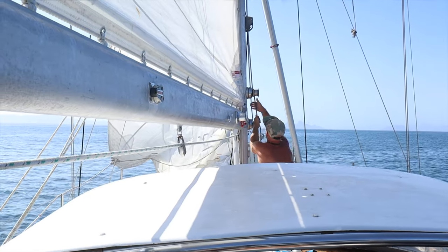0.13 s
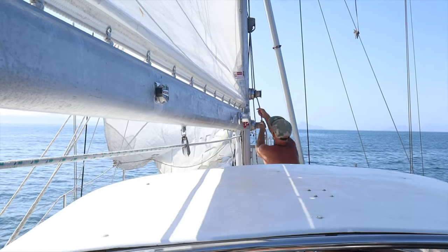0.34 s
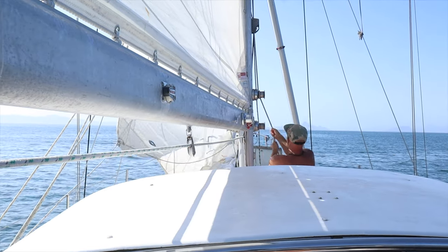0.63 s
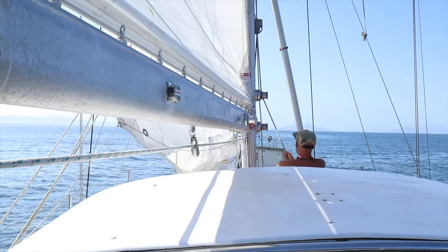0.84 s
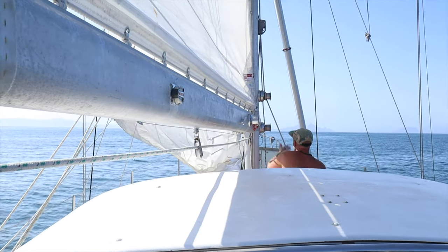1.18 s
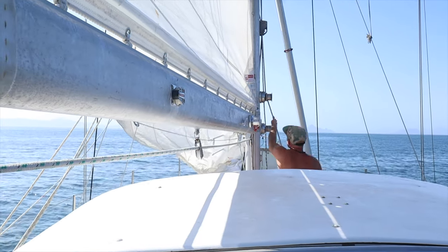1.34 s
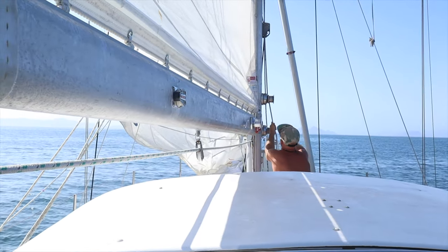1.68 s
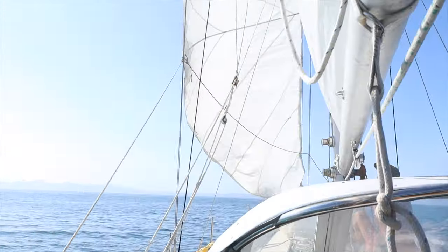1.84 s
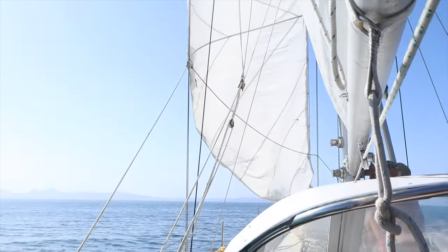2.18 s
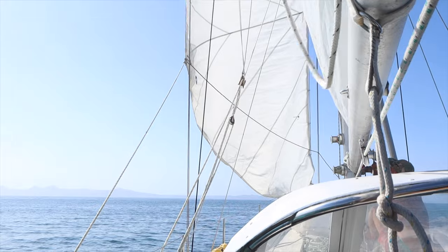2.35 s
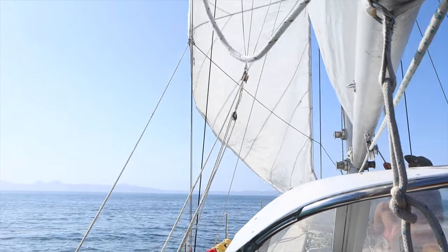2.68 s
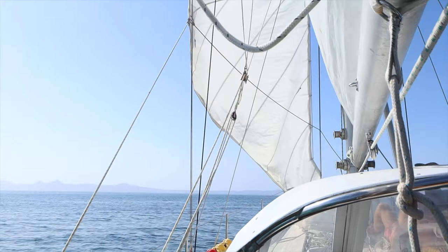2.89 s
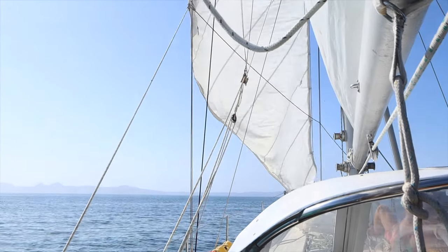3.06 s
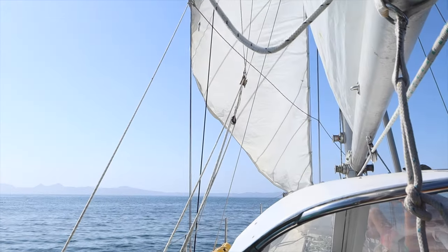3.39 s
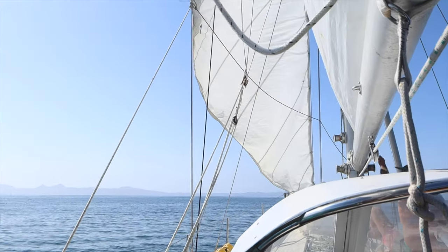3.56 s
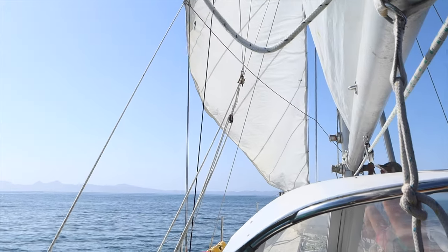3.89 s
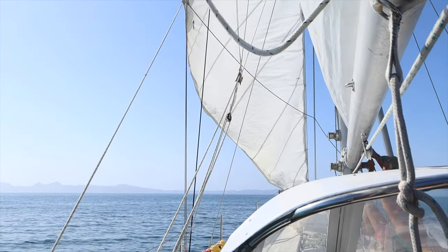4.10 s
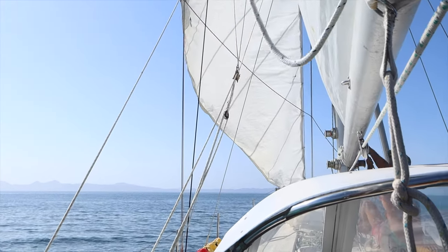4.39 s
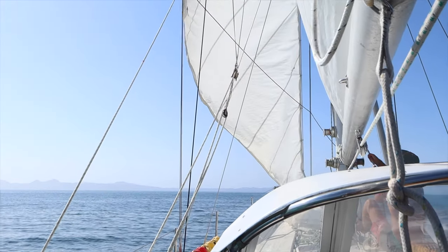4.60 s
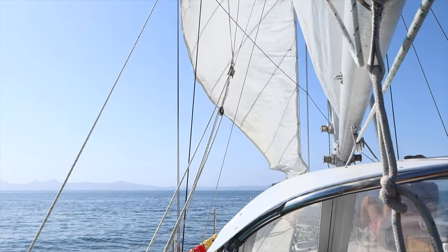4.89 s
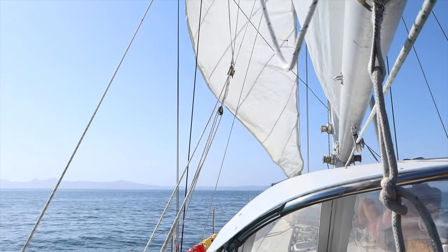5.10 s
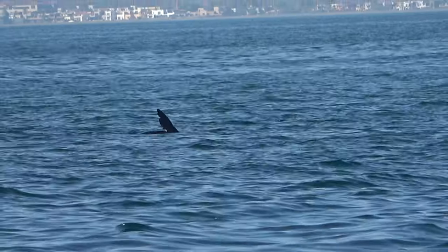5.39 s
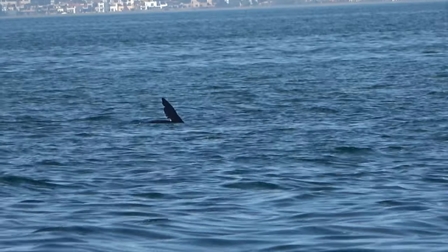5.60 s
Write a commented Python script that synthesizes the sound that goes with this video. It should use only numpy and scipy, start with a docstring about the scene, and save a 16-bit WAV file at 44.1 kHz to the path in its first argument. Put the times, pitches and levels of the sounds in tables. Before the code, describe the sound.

A sailboat's ratchet winch buzzes and rings through three pulls of squeaking, rasping rope, with wind on the microphone and faint water.

```python
"""A ratchet winch on a sailboat's mast clicks and rings as a rope is hauled round it in three pulls.
Its pawls (the catches that drop over the ratchet teeth) speed up from ticks to a buzz. The rope squeaks
as it starts to slide and rasps along the mast, and the metal drum rings until the rope grips it again.
Gear knocks now and then, wind buffets the microphone and calm open water hisses faintly.
At the end a soft wash of ripples swells."""
import sys
import numpy as np
from scipy import signal
from scipy.fft import rfft, irfft, next_fast_len
from scipy.io import wavfile
from scipy.ndimage import uniform_filter1d

SR = 44100
rng = np.random.default_rng(int(sys.argv[2]) if len(sys.argv) > 2 else 0)


def put_to_file(sound):
    """Save the sound as 16-bit audio at rate SR, in the file named by the first command-line argument."""
    columns = np.atleast_2d(sound).T  # one column per channel
    safe = np.clip(columns, -1, 1)
    whole_steps = np.round(safe * 32767)
    wavfile.write(sys.argv[1], SR, whole_steps.astype(np.int16))


N = 253134
TIME = np.arange(N) / SR
FULL_SPEED = 120   # ratchet teeth per second; a speed of 1 in the functions means this

# Levels in the tables are relative: the functions scale them further.
# how fast the drum turns, one curve per pull: (time [s], speed [teeth/s])
SPEED_CURVES = [
    [(0.2828, 31), (0.373, 66), (0.51, 100), (0.58, 120), (0.77, 145), (1.02, 120), (1.08, 72), (1.13, 38),
     (1.2, 14)],
    [(2.356, 27), (2.5366, 61), (2.7, 120), (2.84, 148), (3.05, 120), (3.13, 62), (3.19, 30), (3.23, 7)],
    [(4.2926, 21), (4.372, 19), (4.425, 46), (4.533, 80), (4.62, 120), (4.96, 127), (5.08, 100), (5.16, 55),
     (5.235, 14)],
]
# the pulls: (time the rope grips again [s], pawl level [dB], pawl ring [dB], rope level [dB])
PULL_SETTINGS = [(1.165, -12, -1, -0.5), (3.217, -15.3, -9, 0), (5.19, -17, -6, -1)]
# a pawl drops extra hard: (time [s], level [dB])
HARD_CLICKS = [(0.909, -8), (1.0693, -17), (1.1777, -18), (2.9147, -6.5), (3.1372, -12.5), (3.1647, -20),
               (4.8299, -8)]
# tone colour of a pawl's snap: (frequency [Hz], level [dB])
SNAP_SPECTRUM = [(800, -16.5), (2500, -3.5), (5000, -9), (6500, -2), (8000, 0), (9200, -4), (10500, -17.5),
                 (12000, -19.5), (14000, -16), (15800, -18.5)]
# tones at which a pawl and the mast ring: (frequency [Hz], width [Hz], level [dB])
PAWL_TONES = [(7038, 57, 13.5), (7007, 110, 10), (6530, 93, 9.5), (14720, 120, 15)]
MAST_TONES = [(324.6, 5, 3.5), (694, 100, -7.5), (963, 20, -17.5), (1072, 47, -5), (1104, 25, -10.5),
              (1513, 6.4, 7), (1684, 43, -1.5), (2360, 130, 2)]
# tone colours of the sliding rope: (frequency [Hz], level [dB])
RASP_SPECTRUM = [(450, -12), (700, 0), (1100, 2), (1700, 1.5), (2500, -4.5), (3200, -12), (5000, -22),
                 (10000, -31)]
RUMBLE_SPECTRUM = [(120, -15), (220, -3.5), (330, -2), (430, -1), (600, -7), (900, -13)]
HISS_SPECTRUM = [(1800, -11.5), (3000, 2), (4200, 1), (5600, -4), (8000, -4.5), (10500, -13),
                 (12000, -40.5), (16000, -34.5)]
# the rope slips in a surge: (middle time [s], half length [s], hiss [dB], rasp [dB])
ROPE_SLIPS = [(0.583, .025, -24, -30), (0.767, 0.045, -25, -46), (0.85, 0.034, -26, -22.5),
              (0.966, 0.015, -30, -35), (1.033, 0.047, -21, -26.5), (2.553, 0.027, -35, -27.5),
              (2.77, 0.05, -29.5, -28), (2.928, 0.025, -22, -21), (2.98, 0.021, -49, -21),
              (3.03, 0.068, -23.5, -27.5), (4.637, 0.017, -22.5, -25), (4.89, 0.03, -26, -24),
              (5.006, 0.015, -27, -25), (5.1, 0.043, -23.5, -25.5)]
# squeaks: (time [s], length [s], first pitch [Hz], last pitch [Hz], level [dB], creak against tone [dB])
ROPE_SQUEAKS = [(0.333, 0.068, 585, 727, -29, 3.5), (0.39, 0.1, 1130, 1440, -33, 2),
                (2.353, 0.043, 950, 930, -34.5, -4.5), (2.397, 0.056, 700, 774, -29, -1),
                (2.431, 0.055, 1150, 1393, -24, -3), (2.483, 0.031, 1130, 1100, -18.5, -6),
                (4.376, 0.041, 1010, 1020, -35, -2), (4.423, 0.0346, 1005, 966, -21, -6),
                (4.48, .04, 1120, 1124, -22, -1.5)]
# the drum's bell-like tones: (frequency [Hz])
DRUM_PITCHES = [1058, 1490, 2724, 4506, 6477, 8590, 8764, 10900, 13538]
# for each of them: (width [Hz], level [dB], time to build and fade [s], share of the pawl ring [0-1])
DRUM_TONES = [(30, -42.5, 0.15, 0), (30, -38, .08, 0), (26, -36, 0.075, 0.1), (16, -35, 0.11, 0.41),
              (18, -32, .07, 0.89), (70, -38.5, 0.099, .4), (29, -37.5, 0.076, 0),
              (216, -49.5, 0.056, 0.16), (43, -57.5, .05, 0.79)]
# the rope catches one drum tone, which sings out: (time [s], frequency [Hz], level [dB])
DRUM_CATCHES = [(0.59, 4506, -39), (0.92, 6477, -24), (1.03, 2724, -27), (1.03, 6477, -31),
                (1.03, 13538, -27), (1.04, 1490, -25.5), (1.105, 4506, -28.5), (1.15, 4506, -40),
                (2.92, 8764, -26), (3.005, 4506, -23), (3.055, 2724, -19), (3.13, 2724, -27),
                (3.21, 2724, -41), (4.64, 4506, -31), (4.9, 1058, -17), (4.92, 2724, -35), (5.1, 2724, -29),
                (5.185, 2724, -30)]
# tones of the drum's rim: (frequency [Hz], width [Hz], level [dB])
RIM_TONES = [(10710, 100, -1), (10960, 70, -9)]
# when the rim whistles: (time [s], length [s], level [dB])
RIM_WHISTLES = [(0.543, 0.069, -38), (2.555, 0.052, -39), (2.701, 0.12, -34), (2.94, 0.26, -49),
                (4.535, 0.037, -34), (4.602, 0.073, -34.5), (4.78, 0.39, -40)]
# knocks: (time [s], level [dB], pitch [Hz], width [share of pitch], time to fade by 60 dB [s])
GEAR_KNOCKS = [(0.252, -39.5, 1500, 1.5, 0.12), (1.174, -28, 840, 0.66, 0.084),
               (1.293, -36, 980, 0.72, 0.09), (1.333, -39, 790, 0.78, 0.2), (1.335, -43, 1690, 0.072, 0.2),
               (1.366, -41, 7000, 0.4, .06), (1.378, -36.5, 3000, 0.69, 0.051), (1.385, -34, 370, 0.6, 0.2),
               (1.553, -27.5, 590, 0.44, 0.14), (1.772, -37.5, 725, 0.65, 0.19),
               (1.825, -50, 1190, 1.4, .08), (1.835, -45, 3600, 0.032, 0.079),
               (2.043, -50, 6000, 0.78, 0.098), (2.243, -37.5, 1670, 0.44, 0.17),
               (3.564, -50.5, 5770, 0.81, 0.22), (4.28, -40, 2800, 0.65, 0.11),
               (4.286, -27, 1150, 1.55, 0.11), (5.151, -23, 345, 0.068, 0.23), (5.19, -31, 550, 0.62, 0.29),
               (5.269, -30.5, 750, 0.46, 0.087), (5.658, -33, 794, 0.34, 0.046)]
# strength of the wind: (time [s], deep buffets [dB], flutter above them [dB])
WIND_LEVELS = [(0.0, -49, -36), (0.06, -41.5, -56), (0.7, -35.5, -38.5), (0.8, -47, -38.5),
               (0.91, -32.5, -40), (1.45, -44.5, -41.5), (1.55, -30, -36), (2.49, -32.5, -42.5),
               (2.78, -28.5, -35), (3.74, -25, -35.5), (4.28, -28.5, -41), (4.89, -25.5, -30.5),
               (4.92, -42, -29), (4.99, -28, -31), (5.13, -33.5, -39), (5.35, -26, -36.5), (5.4, -43, -45),
               (5.74, -38, -50)]
# tone colours of the wind: (frequency [Hz], level [dB])
BUFFET_SPECTRUM = [(10, -10.5), (22, -2), (36, 2.5), (70, -4.5), (110, -11), (200, -28.5)]
FLUTTER_SPECTRUM = [(55, -8), (95, -1.5), (160, -1), (250, -9), (400, -29), (800, -40.5)]
# loudness of the sea round the hull: (time [s], level [dB])
SEA_LOUDNESS = [(0.2, -46.5), (1.55, -41.5), (1.95, -46.5), (5.38, -47)]
# tone colours of the sea and the closing wash: (frequency [Hz], level [dB])
SEA_SPECTRUM = [(180, -8), (300, -4.5), (480, -9.5), (750, -13.5), (1300, -20.5), (2800, -28.5),
                (7300, -34), (16000, -37.5)]
WASH_SPECTRUM = [(150, -24), (300, -9.5), (450, -3), (700, -9), (1000, -7), (1600, -11), (3000, -16),
                 (5200, -20), (6200, -28.5), (9000, -32.5), (16000, -47)]


def ratchet(speed, pawl_db, uneven_db=2.02, jitter_s=0.00054, bounce_s=0.005, bounce_db=-7):
    """Times and strengths of one click and its bounce per tooth, harder as the drum turns faster."""
    teeth_passed = np.ceil(np.cumsum(speed) * FULL_SPEED / SR)
    teeth = np.flatnonzero(np.diff(teeth_passed, prepend=0))
    jitter, uneven, loose = rng.standard_normal((1000, 3))[:len(teeth)].T
    times = TIME[teeth] + jitter_s * jitter
    strengths = speed[teeth] * from_db(pawl_db[teeth] + uneven_db * uneven)
    bounce_times = times + bounce_s * np.exp(loose / 2)
    return np.r_[times, bounce_times], np.r_[strengths, from_db(bounce_db) * strengths]


def pawls(speeds, pawl_db, ring_db, snap_s=0.028, tail_s=0.069, tail_db=-13):
    """Each drop of a pawl is a snap of noise with a softer tail; it makes the pawl ring."""
    hard_s, hard_db = np.transpose(HARD_CLICKS)
    clicks = [ratchet(speed, pawl_db) for speed in speeds]
    times, strengths = np.hstack(clicks + [(hard_s, from_db(hard_db))])
    power = np.zeros(N)
    np.add.at(power, (times * SR).astype(int), strengths ** 2)
    power = lagged(power, lag_s=0.0005)
    envelope = np.sqrt(decay(power, snap_s) + from_db(tail_db) ** 2 * decay(power, tail_s))
    snap = colour(envelope * rng.standard_normal(N), SNAP_SPECTRUM)
    return snap + from_db(ring_db) * ringing(snap, PAWL_TONES)


def rope(speed, rasp_db=-23.5, rumble_db=-29, hiss_db=-37):
    """Strands catch and slip, shaking the hollow mast; fibres hiss on the drum. All grow with speed."""
    slip_hiss, slip_rasp = sum(from_db([[hiss], [rasp]]) * np.exp(-((TIME - s) / half_s) ** 2)
                               for s, half_s, hiss, rasp in ROPE_SLIPS)
    rasp = through_mast(noise(RASP_SPECTRUM, grain_db=1.9, grain_rate=350))
    rumble = through_mast(noise(RUMBLE_SPECTRUM, grain_db=1.5, grain_rate=150))
    hiss = noise(HISS_SPECTRUM, grain_db=3.4, grain_rate=400)
    # hypot adds the power of steady sliding to the power of the slips
    rasp *= np.hypot(from_db(rasp_db) * speed ** 1.12, slip_rasp)
    rumble *= np.hypot(from_db(rumble_db) * speed ** 0.92, from_db(-7) * slip_rasp)
    hiss *= np.hypot(from_db(hiss_db) * speed ** 0.88, slip_hiss)
    judder = from_db(0.5 * drift(60))
    return judder * (rasp + rumble + hiss)


def through_mast(x):
    """The hollow mast adds its own tones to a sound; the result has a power of one."""
    return rms_one(x + ringing(x, MAST_TONES))


def squeaks(overtone_db=-22):
    """The tight rope sticks and slips: a gliding tone, broken up by uneven slips into a creak."""
    out = np.zeros(N)
    for s, length, first_hz, last_hz, db, creak_db in ROPE_SQUEAKS:
        hz = np.interp(TIME, [s, s + length], [first_hz, last_hz])
        wobble = 1 + 0.05 * from_db(creak_db) * drift(250)
        phase = 2 * np.pi * np.cumsum(hz * wobble) / SR
        creak = (drift(380) * np.sin(phase) + drift(380) * np.cos(phase)) / np.sqrt(2)
        tone = np.sin(phase) + from_db(overtone_db) * np.sin(2 * phase)
        envelope = between(s, s + length, attack_s=0.015, release_s=0.016)
        out += from_db(db) * envelope * (tone + from_db(creak_db) * creak)
    return out


def drum(speed, ring_db, catch_db=-1, attack_s=0.0095, fade_s=0.035):
    """Rubbing makes the drum ring like a bell, lingering as it slows; at times one tone sings out."""
    rub = speed ** 1.6
    levels = [from_db(db + share * ring_db) * lagged(rub, lag_s) for _, db, lag_s, share in DRUM_TONES]
    for s, hz, db in DRUM_CATCHES:
        nearest = np.argmin(np.abs(np.array(DRUM_PITCHES) - hz))
        from_peak = np.maximum((s - TIME) / attack_s, (TIME - s) / fade_s)
        levels[nearest] += from_db(db + catch_db) * np.exp(-from_peak.clip(max=20))
    return sum(level * singing(hz, width)
               for level, hz, (width, *_) in zip(levels, DRUM_PITCHES, DRUM_TONES))


def singing(hz, width, flare_db=1.5):
    """One tone kept ringing by rubbing; the shifting turns of rope damp it unevenly."""
    ring = resonate(resonate(rng.standard_normal(N), hz, width), hz, width)
    return evened(ring, window_s=0.14) * from_db(flare_db * drift(22))


def whistles():
    """The drum's rim whistles thinly once the drum is well under way."""
    envelope = sum(from_db(db) * between(s, s + length, attack_s=0.019, release_s=0.03)
                   for s, length, db in RIM_WHISTLES)
    return envelope * sum(from_db(db) * singing(hz, width) for hz, width, db in RIM_TONES)


def knocks(boost_db=2, attack_s=0.0081):
    """Rope and fittings strike soft blows that die away quickly."""
    out, age = np.zeros(N), TIME[:SR // 3]
    attack = np.minimum(age / attack_s, 1)
    for s, db, hz, width, fade_s in GEAR_KNOCKS:
        thud = resonate(rng.standard_normal(len(age)), hz, width * hz)
        thud = rms_one(resonate(thud, hz, 2 * width * hz))
        thud *= attack * from_db(db + boost_db - 60 * age / fade_s)
        start = int(s * SR)
        out[start:start + len(age)] += thud[:N - start]
    return out


def deck_echoes(x, echo_db=-12, fade_s=0.05, count=24):
    """Mast, boom, sail and cabin top add a scatter of quick echoes to a sound."""
    distance, flip = rng.random((count, 2)).T
    delays_s = 0.002 + 0.03 * distance
    strengths = rms_one(from_db(-60 * delays_s / fade_s)) * np.sign(flip - 0.5) / np.sqrt(count)
    echoes = sum(gain * np.interp(TIME - delay, TIME, x) for delay, gain in zip(delays_s, strengths))
    return (x + from_db(echo_db) * echoes) / np.hypot(1, from_db(echo_db))


def wind(buffet_trim_db=1, flutter_trim_db=-1):
    """Air swirls at the microphone: deep buffets with a quicker flutter above."""
    buffet_db, flutter_db = in_time(WIND_LEVELS)
    buffet = evened(noise(BUFFET_SPECTRUM), window_s=0.86)
    flutter = evened(noise(FLUTTER_SPECTRUM, grain_db=3.5, grain_rate=40), window_s=0.18)
    return from_db(buffet_db + buffet_trim_db) * buffet + from_db(flutter_db + flutter_trim_db) * flutter


def water(wash_start_s=5.385, wash_db=-48, rise_db_per_s=17):
    """A faint sea hiss gives way to a duller, closer wash of ripples that swells."""
    sea = from_db(in_time(SEA_LOUDNESS)[0]) * noise(SEA_SPECTRUM, grain_db=1, grain_rate=90)
    swell = from_db(wash_db + rise_db_per_s * (TIME - wash_start_s))
    wash = swell * noise(WASH_SPECTRUM, grain_db=2, grain_rate=90)
    return np.where(TIME < wash_start_s, sea, wash)


def from_db(db):
    """Turn decibels into a number to multiply by."""
    return 10 ** (np.asarray(db) / 20)


def rms_one(x):
    """Scale a sound to an average power of one."""
    return x / np.sqrt(np.mean(x ** 2) + 1e-20)


def evened(x, window_s):
    """Hold the power near one over every stretch of the given length."""
    size = int(window_s * SR / 2)
    power = uniform_filter1d(uniform_filter1d(x * x, size), size)
    return x / np.sqrt(np.abs(power) + 1e-5 * np.mean(x * x))


def in_time(rows):
    """Join a table's timed points with straight lines, one curve per column of values."""
    times, *columns = np.transpose(rows)
    return [np.interp(TIME, times, column) for column in columns]


def between(start, end, attack_s, release_s):
    """One from start to end, fading in before and out after."""
    return np.clip(np.minimum((TIME - start) / attack_s, (end - TIME) / release_s) + 1, 0, 1)


def lagged(x, lag_s):
    """Follow a curve sluggishly, as something heavy would."""
    keep = np.exp(-1 / (lag_s * SR))
    return signal.lfilter([1 - keep], [1, -keep], x + 1e-18)


def decay(power, fade_s):
    """Let pulses of power die away by 60 dB in fade_s."""
    return signal.lfilter([1], [1, -from_db(-120 / (fade_s * SR))], power + 1e-18)


def drift(rate):
    """A random wander of about one either way that changes rate times a second."""
    points = rng.standard_normal(N // 32)
    return np.interp(TIME * rate, np.arange(len(points)), points) * np.sqrt(3 / 2)


def colour(x, spectrum):
    """Filter a sound to the given tone colour, falling 20 dB per octave past its ends."""
    hz, db = np.transpose(spectrum)
    size = 2 * next_fast_len(N // 2 + SR // 8)
    grid_hz = np.maximum(np.arange(size // 2 + 1) * SR / size, 1)
    octaves_outside = np.maximum(np.log2(hz[0] / grid_hz), 0) + np.maximum(np.log2(grid_hz / hz[-1]), 0)
    gain = from_db(np.interp(np.log(grid_hz), np.log(hz), db) - 20 * octaves_outside)
    # minimum phase: the filter never sounds ahead of a click
    cepstrum = irfft(np.log(gain))
    cepstrum[1:size // 2] *= 2
    cepstrum[size // 2 + 1:] = 0
    return irfft(rfft(x, size) * np.exp(rfft(cepstrum)))[:N]


def noise(spectrum, grain_db=0, grain_rate=100):
    """Coloured noise with a power of one; its level flickers grain_rate times a second."""
    grainy = rng.standard_normal(N) * from_db(grain_db * drift(grain_rate))
    return rms_one(colour(grainy, spectrum))


def resonate(x, hz, width):
    """Ring at one frequency; the smaller the width in Hz, the longer the ring."""
    radius = np.exp(-np.pi * width / SR)
    feedback = [1, -2 * radius * np.cos(2 * np.pi * hz / SR), radius ** 2]
    return signal.lfilter(np.array([1, 0, -1]) * (1 - radius ** 2) / 2, feedback, x + 1e-18)


def ringing(x, tones):
    """The tones that a sound sets ringing in an object."""
    return sum(from_db(db) * resonate(x, hz, width) for hz, width, db in tones)


def scene(pull_s=0.92, grip_s=0.058, stretch_lag_s=0.01):
    """The winch and its rope, driven by the speed of the drum, over knocks, wind and water."""
    speeds = [np.interp(TIME, *np.transpose(curve), left=0, right=0) / FULL_SPEED
              for curve in SPEED_CURVES]
    speed = sum(speeds)
    pulls = np.array(PULL_SETTINGS)
    current_pull = np.maximum(np.searchsorted(pulls[:, 0] - pull_s, TIME) - 1, 0)
    end_s, pawl_db, ring_db, rope_db = pulls[current_pull].T
    clicks = pawls(speeds, pawl_db, ring_db)
    sliding = from_db(rope_db) * rope(lagged(speed, stretch_lag_s))   # stretchy rope trails the drum
    winch = deck_echoes(clicks + sliding + squeaks())
    free = between(end_s - pull_s, end_s, grip_s, grip_s)   # the drum rings until the rope grips it
    return (winch + free * drum(speed, ring_db) + whistles() + knocks() + wind() + water())[None]


def record(dry, cutoff_hz=15800):
    """Cut the very highest treble steeply."""
    return signal.sosfilt(signal.ellip(12, 0.2, 90, cutoff_hz, fs=SR, output="sos"), dry)


dry = scene()
out = record(dry)
put_to_file(out)
```